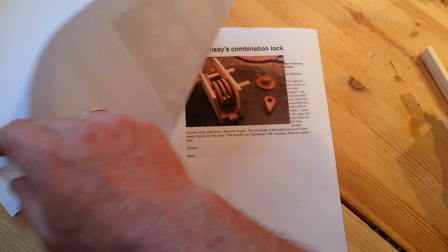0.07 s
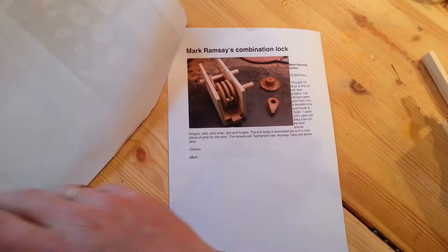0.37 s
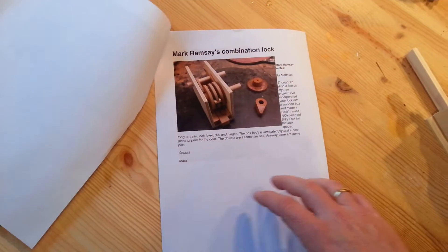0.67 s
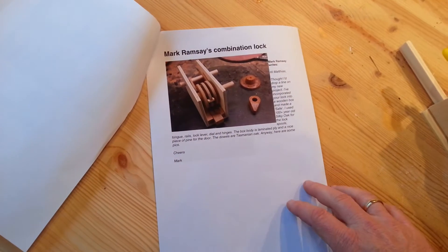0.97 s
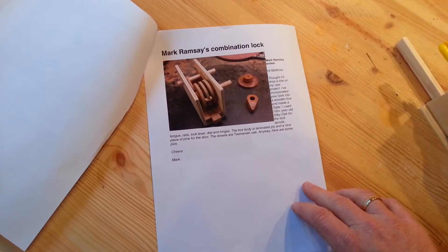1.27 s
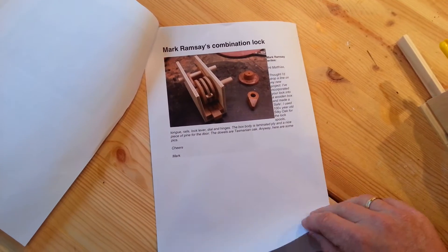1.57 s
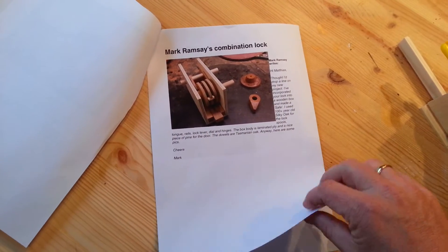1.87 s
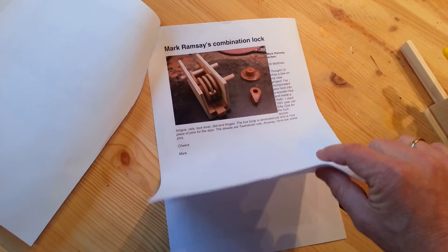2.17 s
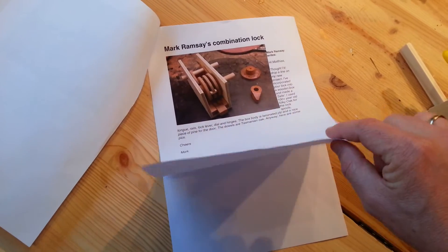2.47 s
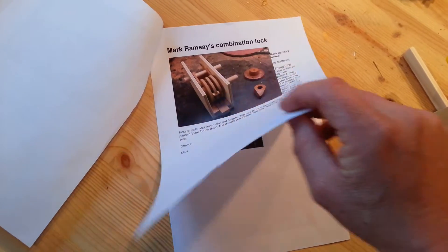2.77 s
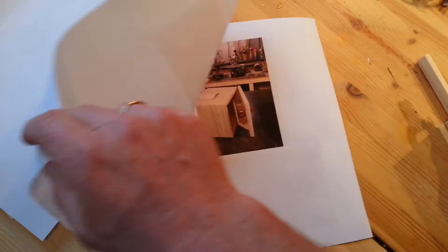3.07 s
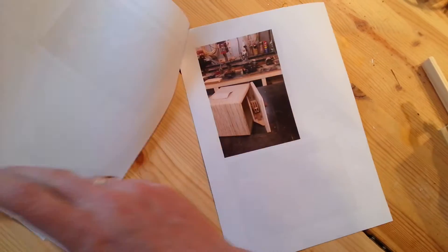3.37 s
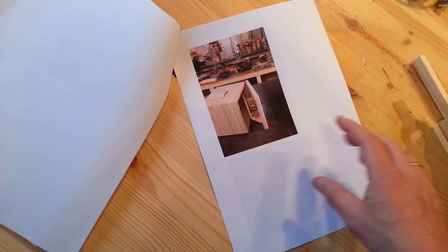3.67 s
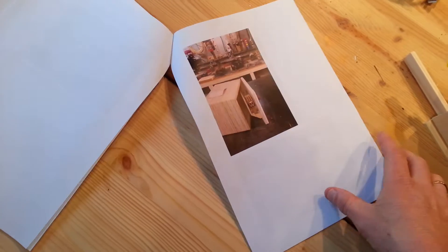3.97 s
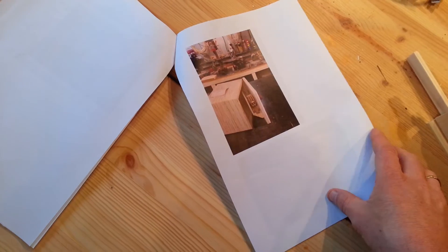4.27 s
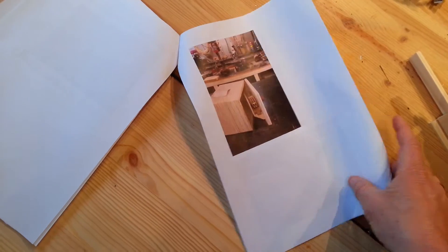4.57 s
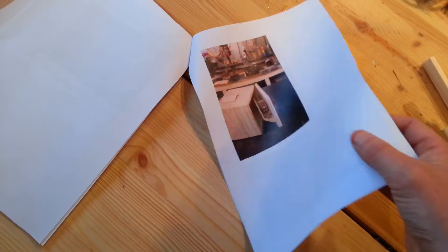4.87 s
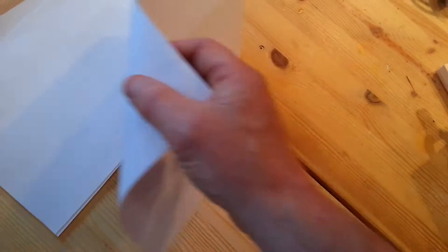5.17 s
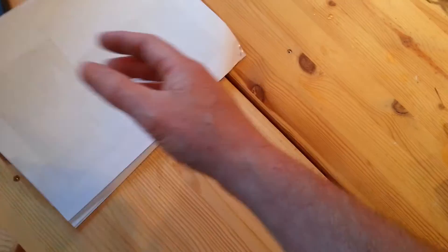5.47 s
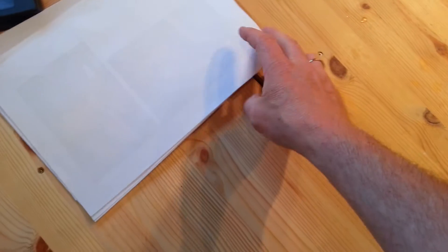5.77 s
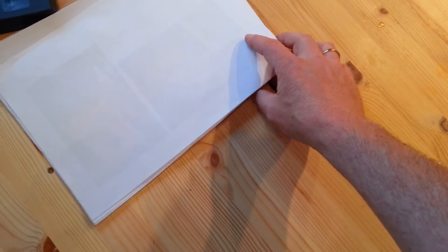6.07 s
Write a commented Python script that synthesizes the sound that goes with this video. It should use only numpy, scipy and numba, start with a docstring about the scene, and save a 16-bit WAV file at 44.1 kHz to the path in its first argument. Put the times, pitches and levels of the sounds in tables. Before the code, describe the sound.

A hand leafs through joined paper sheets on a wooden table. Fingers rub and slide over the paper in short, raspy swishes, and pages bend, crackle and flop over three times. About halfway, a falling page puffs air into the right side of the microphone with a brief thump. A few soft knocks on the wood come later. The sound is close and in stereo, in a small, quiet room.

```python
"""Leafing through paper

A hand leafs through joined sheets on a wooden table, close to a small stereo recorder in a room.
Fingers and sheets rub in countless tiny slips; each lifted page bends, snaps and flops over to the left.
One falling page pushes a puff of air into the right microphone's port (its opening)."""
import sys
import numpy as np
from scipy import signal
from scipy.fft import rfft, irfft
from scipy.io import wavfile
from scipy.ndimage import map_coordinates
from numba import njit

SR = 44100
rng = np.random.default_rng(int(sys.argv[2]) if len(sys.argv) > 2 else 0)


def waveform_to_disk(signal):
    """Save audio, clipped to [-1, 1], as 16-bit WAV at the path in sys.argv[1]."""
    frames = np.transpose(np.atleast_2d(signal))
    scaled = np.clip(frames, -1, 1) * 32767
    samples = np.round(scaled).astype(np.int16)
    wavfile.write(sys.argv[1], SR, samples)


N = 270333
TIME = np.arange(N) / SR


def from_db(db):
    """Turn decibels into a gain to multiply by."""
    return 10 ** (np.asarray(db) / 20)


def rms_one(x):
    """Scale a sound to an average (rms) level of 1."""
    return x / np.sqrt(np.mean(x ** 2) + 1e-20)


def in_time(rows):
    """Join a table's timed rows with straight lines: one curve for each column after the time."""
    times, *columns = np.transpose(rows)
    return [np.interp(TIME, times, column) for column in columns]


def colour(x, points, size=4096):
    """Shape the tone along (Hz, dB) points, with a filter that never rings ahead of the sound."""
    hz, db = np.transpose(points)
    log_hz = np.log(np.fft.rfftfreq(size, 1 / SR) + 1)
    cepstrum = irfft(np.log(from_db(np.interp(log_hz, np.log(hz), db))))
    cepstrum[1:size // 2] *= 2   # fold the early half onto the late half (minimum phase)
    cepstrum[size // 2 + 1:] = 0
    response = irfft(np.exp(rfft(cepstrum)))
    return signal.oaconvolve(np.atleast_2d(x), response[None], axes=1)[:, :N]


def drift(rate):
    """A smooth random wander of size about 1, with roughly `rate` turns a second."""
    pole = np.exp(-40 * np.pi * rate / SR)
    noise = rng.standard_normal(N // 20 + 2002)
    slow = signal.lfilter([1], [1, -2 * pole, pole * pole], noise)[2000:]
    return np.interp(np.arange(N) / 20, np.arange(len(slow)), rms_one(slow))


def delayed(x, ms):
    """Make a sound late by a delay that can keep changing."""
    return map_coordinates(x, [np.arange(N) - ms * SR / 1000], order=3)


def band_pass(x, hz, q):
    """Keep the sound near one pitch; a higher q keeps a narrower band."""
    return signal.lfilter(*signal.iirpeak(hz, q, fs=SR), x)


@njit
def swept_band(x, tangent, damping):
    """A band-pass (state-variable filter) whose pitch may move at every sample."""
    out = np.zeros_like(x)
    for side in range(len(x)):
        band_state, low_state = 0., 0.
        for i in range(x.shape[1]):
            g = tangent[i]
            band = (band_state + g * (x[side, i] - low_state)) / (1 + g * (g + damping))
            band_state = 2 * band - band_state
            low_state += 2 * g * band
            out[side, i] = damping * band
    return out


def resonate(x, hz, height_db, q):
    """Lift one moving pitch and lower the rest, so that loudness changes little."""
    height = from_db(height_db)
    band = swept_band(np.ascontiguousarray(x), np.tan(np.pi * hz / SR), 1 / q)
    return (x + (height - 1) * band) / np.sqrt(height)


def ringing(x, t60, size):
    """Ring very many pitches at once; t60 is the ring time, the seconds taken to fade by 60 dB."""
    tail = rng.standard_normal((2, size)) * np.exp(-np.log(1000) * TIME[:size] / t60)
    tail /= np.linalg.norm(tail, axis=1, keepdims=True)
    return signal.oaconvolve(x, tail, axes=1)[:, :N]


# tone of the background (frequency [Hz], relative level [dB])
HISS_TONE = [(20, 11), (160, 14), (350, 6), (800, -7.5), (2500, -6.5), (10000, -1), (15000, -2.5)]

def background_hiss(level_db=-75):
    """The still room and the recorder make a faint, steady noise."""
    return from_db(level_db) * rms_one(colour(rng.standard_normal((2, N)), HISS_TONE))


def room(x, t60=0.096, echo_db=-14):
    """A small furnished room adds a quick blur of echoes, different on each side."""
    return x + from_db(echo_db) * ringing(x, t60, size=16384)


# how the two microphone ports differ (frequency [Hz], left minus right [dB])
PORT_BALANCE = [(100, 0.5), (550, 2), (1140, -3), (1650, -6.5), (2400, -2.5), (3400, -3), (5000, 1),
                (6200, 2.5), (7200, -4.5), (8300, -12), (9700, -14), (15000, -15.5)]

def microphone_ports(x, left_hz=5770, right_hz=8920, ring_db=2.5):
    """Each port colours the sound, and its small cavity rings at a pitch of its own."""
    hz, tilt_db = np.transpose(PORT_BALANCE)
    right_db = 10 * np.log10(2 / (1 + from_db(tilt_db) ** 2))   # keeps the total power the same
    left = colour(x[0], np.c_[hz, right_db + tilt_db])[0]
    right = colour(x[1], np.c_[hz, right_db])[0]
    lift = from_db(ring_db) - 1
    return left + lift * band_pass(left, left_hz, q=7), right + lift * band_pass(right, right_hz, q=7)


def air_puff(port, start_s=3.23825, rise_s=.00006, hold_s=0.018, release_s=0.0053, ease_s=0.02):
    """Air pins the microphone's diaphragm, briefly deafening it; the bass cut makes that push a thump."""
    blocked_db, thump_db = -18, 2
    age = np.maximum(TIME - start_s, 0)
    freed = np.maximum(age - hold_s, 0)
    pinned = (age > 0) * np.exp(-(freed / release_s) ** 2)
    pressure = (1 - np.exp(-age / rise_s)) * np.exp(-(freed / ease_s) ** 2)
    bass_cut = signal.butter(1, 76, "high", fs=SR, output="sos")
    rumble_cut = signal.butter(2, 56, "high", fs=SR, output="sos")
    thump = signal.sosfilt(np.vstack([bass_cut, bass_cut, rumble_cut]), pressure)
    return port * from_db(blocked_db * pinned) + from_db(thump_db) * thump


# how hollow the rubbing sounds (time [s], delay of the copy [ms], strength [0-1])
HOLLOWNESS = [(.3, 0.69, 0.02), (.7, 0.71, 0.19), (1.75, 0.75, 0.2), (2.1, 0.87, 0.02), (3.3, 0.62, 0),
              (3.97, 0.63, 0.23), (4.6, 0.78, 0), (5.07, 0.53, 0.26), (5.4, 1, 0.07)]

def hollow_tone(x, dull_hz=3000, hollow_hz=760):
    """A dull, late copy and a dip near 760 Hz make some strokes sound hollow."""
    delay_ms, strength = in_time(HOLLOWNESS)
    dull = signal.sosfilt(signal.butter(1, dull_hz, fs=SR, output="sos"), x)
    late_copy = np.array([delayed(side, delay_ms) for side in dull])
    mixed = (x + strength * late_copy) / np.sqrt(1 + strength ** 2 / 2)
    return mixed - 1.5 * strength * band_pass(mixed, hollow_hz, q=1.1)


# the table top's own notes (pitch [Hz], relative level [dB], ring time [s])
WOOD_NOTES = [(112, -12, .09), (160, -7, .08), (243, -5, .07), (324, -1.5, .11), (465, -7.5, .02)]
# knocks on the table (time [s], strength [dB])
KNOCKS = [(1.308, -60), (1.396, -66.5), (1.524, -55), (2.682, -58), (4.592, -43.5), (4.734, -42.5),
          (5.428, -56), (5.866, -62)]

def table_knocks(soft_hz=900, spread_db=4.0):
    """Fingertips and the page's edge knock softly, each time ringing a new mix of the wood's notes."""
    out = np.zeros(N)
    times, knock_db = np.transpose(KNOCKS)
    at = np.round(times * SR).astype(int)
    for hz, note_db, t60 in WOOD_NOTES:
        clicks = np.full(N, 1e-18)
        clicks[at] = from_db(knock_db + note_db + rng.normal(0, spread_db, len(times)))
        fade, turn = np.exp(-np.log(1000) / (t60 * SR)), 2 * np.pi * hz / SR   # per sample
        out += signal.lfilter([.5, 0, -.5], [1, -2 * fade * np.cos(turn), fade * fade], clicks)
    return signal.sosfilt(signal.butter(2, soft_hz, fs=SR, output="sos"), out)


# the stiff corner's notes (pitch [Hz], relative level [dB])
CORNER_NOTES = [(3300, -13.5), (5850, -1.5), (7500, 0.5), (9150, -2)]

def corner_flick(start_s=1.5241, bounce_ms=0.538, gain_db=-10.3, t60=0.0036):
    """The page's corner slips off the finger, clicks down and bounces once, ringing very briefly."""
    out = np.zeros(N)
    for hit_s in (start_s, start_s + bounce_ms / 1000):
        age = np.clip(TIME - hit_s, 0, .1)
        notes = sum((-1) ** k * from_db(db) * np.sin(2 * np.pi * hz * age)
                    for k, (hz, db) in enumerate(CORNER_NOTES))
        out += notes * np.exp(-np.log(1000) * age / t60)
    return from_db(gain_db) * out


# the sheet snaps and buckles (time [s], level [dB], pitch [Hz], fade time [ms])
CREASES = [(.226, -41, 730, 61), (.25, -29.5, 1680, 16), (.285, -37, 1030, 22), (0.483, -66.5, 960, 39),
           (1.108, -34, 9370, 0.82), (1.117, -30, 9600, 0.31), (1.288, -60.5, 1290, 20),
           (1.289, -49.5, 8700, 19), (1.2996, -28, 9400, 0.27), (1.5242, -20, 5750, 4.5),
           (1.861, -43.5, 3598, 11), (1.983, -37, 1750, 6.4), (2.088, -44.5, 766, 54),
           (2.131, -31, 8350, 7), (2.212, -34.5, 1240, 4.7), (2.508, -24, 6440, 11),
           (2.508, -32.5, 1890, 21), (2.5164, -19.5, 7400, 3.6), (2.5212, -16.5, 8700, 2.4),
           (2.521, -36, 520, 13), (2.5303, -20, 1710, 2.1), (2.53, -27, 3180, 10),
           (2.584, -39.5, 2210, 9.8), (2.682, -55, 1290, 23), (2.8, -32, 2880, 2.2),
           (2.809, -36.5, 1480, 5.5), (3.254, -29, 9500, 20), (3.263, -40, 3380, 29), (3.272, -40, 677, 40),
           (4.207, -46, 4300, 26), (4.5872, -7.5, 7880, 0.87), (4.587, -25, 1710, 11.5),
           (4.5914, -23.5, 6000, 5.4), (4.722, -21, 7350, 1.6), (4.722, -34, 1090, 7.8),
           (4.731, -19, 6600, 0.97), (4.734, -23, 1640, 4.3), (5.218, -61.5, 1770, 12),
           (5.296, -54.5, 6630, 19), (5.376, -34, 6500, 11), (5.425, -37, 1120, 18),
           (5.561, -52, 2036, 13.5), (5.866, -25.5, 8200, 1.1), (5.866, -45.5, 1580, 3.2),
           (5.8717, -21.5, 8070, 0.82)]

def crease_snaps(shared=0.32, rise_cycles=0.46, crack=0.93, crackle_db=2.5, grain_ms=0.54, size=4096):
    """A crease runs through the sheet in a dying, uneven crackle: small patches tick, large ones pop."""
    out, age_ms = np.zeros((2, N)), 1000 * np.arange(size) / SR
    grain = (age_ms / grain_ms).astype(int)
    for start_s, db, hz, fade_ms in CREASES:
        noise = rng.standard_normal((3, size))   # left, right, and shared by both
        jumps = from_db(crackle_db * np.clip(rng.standard_normal(size), -2, 2))[grain]
        shape = np.exp(-age_ms / fade_ms) * (1 - np.exp(-TIME[:size] * hz / rise_cycles))
        burst = (np.sqrt(shared) * noise[2] + np.sqrt(1 - shared) * noise[:2]) * shape * jumps
        burst[:, 0] += crack / fade_ms ** 2   # the smallest patches flip in one go
        q = max(1, hz / 6500)
        burst = band_pass(band_pass(burst, hz, q), hz, q)
        burst *= np.linalg.norm(shape) / np.linalg.norm(burst, axis=1, keepdims=True)
        at = round(start_s * SR)
        out[:, at:at + size] += from_db(db) * burst[:, :N - at]
    return out


def slips(per_s, spread_db, bed):
    """Fibres catch and let go: uneven clicks over a bed of slips too fine to tell apart."""
    sizes = from_db(spread_db * np.minimum(rng.exponential(1, N), 4)) * rng.choice([-1, 1], N)
    clicks = rms_one(sizes * (rng.random(N) < per_s / SR))
    return rms_one(clicks + bed * rng.standard_normal(N))


# where the page rubs (time [s], left side's delay [ms], left minus right [dB])
PAGE_PLACE = [(0, 0.032, 0), (.6, 0.2, 4), (1.7, -0.0013, 1), (2.7, 0.048, 0.5), (3.45, -0.067, 1.5),
              (4.5, -.09, 1), (5.4, 0.12, 1)]

def paper(tone, per_s, spread_db, bed, patchy_db, shared, ring_db, t60):
    """Slips at the touching point reach both ports; the rest of the sheet sounds different in each."""
    lag_ms, _ = in_time(PAGE_PLACE)
    contact = slips(per_s, spread_db, bed)
    contact = np.array([delayed(contact, lag_ms), contact])
    sheet = np.array([slips(per_s, spread_db, bed) for side in range(2)])
    # the sheet's brief ring changes as it curls from one shape into another
    flat, curled = (ringing(sheet, t60, size=2048) for shape in range(2))
    curl = 2 * drift(0.99)
    sheet = rms_one(sheet + from_db(ring_db) * (np.cos(curl) * flat + np.sin(curl) * curled))
    both = np.sqrt(shared) * contact + np.sqrt(1 - shared) * sheet
    return rms_one(colour(both * from_db(patchy_db * drift(40)), tone))


def pan_with_page(x):
    """The left-right balance follows the place where the page rubs."""
    _, pan_db = in_time(PAGE_PLACE)
    return x * from_db(np.outer([1, -1], pan_db) / 2)


# a lifted sheet bends over or flops down
# (crest time [s], flutter level [dB], build-up time [s], rumble above flutter [dB], pitch [Hz])
PAGE_FLAPS = [(0.103, -45.5, 0.039, -6, 850), (0.237, -32, 0.011, -6.5, 996),
              (0.262, -30, 0.012, -15, 1468), (1.985, -54.5, 0.012, -2, 1500),
              (2.104, -44.5, 0.04, -4.5, 1345), (2.225, -47, 0.23, -9.5, 846),
              (2.302, -46.5, 0.013, -13.5, 1150), (2.535, -38.5, 0.024, -9.5, 1683),
              (2.818, -43, 0.023, -8, 1580), (2.901, -50.5, 0.0083, -19, 1600),
              (3.282, -38.5, 0.052, -7.5, 1130), (3.834, -47, 0.025, -7.5, 1450),
              (4.444, -54, 0.018, 3.5, 1500), (4.635, -43, 0.031, -3, 1695), (4.73, -33, 0.0043, -9, 950),
              (5.07, -56.5, 0.14, -25, 2300), (5.318, -43.5, 0.0082, -8, 1140),
              (5.434, -50, 0.048, 2, 1100)]

def flap_curves(rub_gain, settle_db_per_s=283.5, sag_octaves_per_s=14, sag_s=0.095):
    """Strokes shake the sheet a little; a flap builds, then fades and drops in pitch as it slackens."""
    shake_db, shake_hz = -16, 2500   # flutter of the taut sheet under a stroke
    drag_db, drag_follows = -54.5, 0.32   # rumble that follows a stroke only in part
    flutter_power = (from_db(shake_db) * rub_gain) ** 2
    rumble_power = (from_db(drag_db) * rub_gain ** drag_follows) ** 2
    weighted_hz = flutter_power * shake_hz   # the loudest movement has most say in the pitch
    for crest_s, db, build_s, rumble_db, hz in PAGE_FLAPS:
        age = np.clip(TIME - crest_s, -1, 1)
        gain = np.exp(np.minimum(age, 0) / build_s) * from_db(db - settle_db_per_s * np.maximum(age, 0))
        flutter_power += gain ** 2
        rumble_power += (gain * from_db(rumble_db)) ** 2
        weighted_hz += gain ** 2 * hz * 2 ** (-sag_octaves_per_s * np.clip(age, 0, sag_s))
    return np.sqrt(flutter_power), np.sqrt(rumble_power), weighted_hz / flutter_power


# tones of the small buckles and of the wobbling surface (frequency [Hz], relative level [dB])
FLUTTER_TONE = [(25, -55.5), (150, -31), (500, -14.5), (800, -9), (1150, -0.5), (1600, 0), (2100, -3),
                (3000, -5.5), (5000, -13.5), (12000, -37.5)]
RUMBLE_TONE = [(25, -38), (60, -16), (120, -4.5), (220, -1), (380, 1), (600, 0.5), (900, -1.5),
               (1500, -13.5), (4000, -43.5)]
# the whole sheet's notes (pitch [Hz], relative level [dB])
SHEET_NOTES = [(1034, 1.5), (1236, 4), (1367, 3), (1562, 4), (1928, 1)]

def bending(flutter_gain, rumble_gain, flutter_hz, note_width_hz=18, notes_db=4):
    """Small buckles patter while the surface wobbles; a hard flap leaves the whole sheet ringing."""
    flutter = paper(FLUTTER_TONE, per_s=1200, spread_db=3.5, bed=0.39,
                    patchy_db=3.0, shared=0.39, ring_db=0.5, t60=0.13)
    rumble = paper(RUMBLE_TONE, per_s=600, spread_db=4.0, bed=0.79,
                   patchy_db=0.5, shared=0.5, ring_db=-4.0, t60=0.091)
    flutter = flutter_gain * resonate(flutter, flutter_hz, height_db=3, q=1.8)
    hard_flaps = flutter * flutter_gain / flutter_gain.max()
    ring = sum(from_db(notes_db + db) * band_pass(hard_flaps, hz, hz / note_width_hz)
               for hz, db in SHEET_NOTES)
    return flutter + ring + rumble_gain * rumble


# gripped stretches of paper (start [s], end [s], pitch [Hz], lift above the rest [dB])
GRIPS = [(0, 0.496, 4960, 5.5), (.59, 0.882, 6130, 5), (1.5, 1.9, 5600, 6), (1.628, 1.864, 2640, 6),
         (1.903, 2.267, 6800, 4.5), (3.033, 3.3, 9700, 3.5), (3.31, 3.671, 5260, 6), (4.15, 4.37, 4270, 7),
         (4.15, 4.375, 2550, 5), (4.9, 5.2, 2940, 4)]

def zipping(x, wander_octaves=0.04):
    """Gripped paper rings around one wavering pitch, making the rubbing zip until the hand lets go."""
    wander = 2 ** (wander_octaves * drift(12))
    for start, end, hz, height_db in GRIPS:
        held = (TIME >= start) & (TIME < end)
        x = resonate(x, hz * wander, height_db * held, q=3.7)
    return x


# paper slides on paper and skin
# (start [s], length [s], rubbing level [dB], swell from start to end [dB], swish above rubbing [dB])
HAND_STROKES = [(0, 0.0087, -42.5, -10, 2.5), (0.063, 0.059, -49.5, -3.5, 2),
                (0.149, 0.015, -50.5, -3, 3.5), (0.179, 0.054, -45.5, 19.5, 1.5),
                (0.294, 0.11, -47, -2, 4.5), (0.521, 0.032, -65, 1, 5.5), (0.62, 0.14, -54, -2.5, 3.5),
                (1.081, 0.059, -61, 9, 6), (1.286, 0.0083, -54.5, -3, -5), (1.378, 0.13, -68.5, 17, 10.5),
                (1.518, 0.1, -42.5, -11, 5.5), (1.626, 0.068, -38, 5.5, 0.5),
                (1.714, 0.082, -39.5, 5.5, -2), (1.853, 0.029, -47, -21, -6),
                (1.898, 0.043, -57.5, 18.5, 0.5), (1.934, 0.15, -43, 7, -2), (2.067, 0.069, -34, 6.5, -0.5),
                (2.162, 0.062, -43.5, 7.5, 2), (2.277, 0.11, -43, 0, 0), (2.476, 0.044, -41, 24.5, -3),
                (2.666, 0.18, -56, 9, 0), (2.866, 0.091, -52, -0.5, 2.5), (2.974, 0.17, -56, 18, -0.5),
                (3.055, 0.2, -50, 12.5, 11), (3.315, 0.14, -50, 4.5, 7), (3.48, 0.28, -67, -26.5, 7.5),
                (3.772, 0.084, -46.5, 5, -1.5), (3.867, 0.14, -52.5, 8, 9), (4.199, 0.086, -43, 12, 2),
                (4.385, 0.082, -46.5, 4, -2.5), (4.481, 0.096, -44.5, 0.5, 4),
                (4.579, 0.058, -35.5, -1, 4.5), (4.695, 0.04, -42.5, 8, 1.5), (4.79, 0.053, -50.5, 2, -2.5),
                (4.908, 0.063, -57.5, -7, 6.5), (4.944, 0.13, -44.5, 7, -1), (5.294, 0.092, -43, 3.5, 2),
                (5.538, 0.053, -57, 5, -3), (5.854, 0.18, -63, -18.5, 2), (6.058, 0.079, -55, 11, 5.5)]

def stroke_gains(grip_s=0.0076, coast_db_per_s=311):
    """Each stroke grips quickly, swells or eases as the hand moves, then coasts to rest."""
    rub_power, swish_power = np.full((2, N), 1e-14)
    for start, length, db, swell_db, swish_db in HAND_STROKES:
        age = TIME - start
        grip = .5 + .5 * np.tanh(age / grip_s - 1)
        push_db = swell_db * (np.clip(age / length, 0, 1) - .5)
        gain = grip * from_db(db + push_db - coast_db_per_s * np.clip(age - length, 0, 1))
        rub_power += gain ** 2
        swish_power += (gain * from_db(swish_db)) ** 2
    return np.sqrt(rub_power), np.sqrt(swish_power)


# tones of flat rubbing and of the page's edge (frequency [Hz], relative level [dB])
RUB_TONE = [(300, -27.5), (900, -34.5), (1700, -6), (2600, -6.5), (3400, -4.5), (4400, -1), (5700, -3),
            (7200, -7), (9500, -8.5), (15000, -25)]
SWISH_TONE = [(3000, -31), (6000, -8), (8000, -6), (9700, -3), (11000, -7.5), (12500, -8.5), (14800, -14)]

def sliding(rub_gain, swish_gain, ticks_db=-14.5):
    """Flat rubbing rasps; the page's edge adds a bright swish and lone ticks where a fibre catches."""
    rub = paper(RUB_TONE, per_s=4000, spread_db=3.5, bed=0.68,
                patchy_db=1.8, shared=0.2, ring_db=-2.0, t60=0.038)
    swish = paper(SWISH_TONE, per_s=3300, spread_db=4.5, bed=0.96,
                  patchy_db=2.08, shared=0.13, ring_db=-4.5, t60=0.022)
    ticks = rms_one(colour(slips(per_s=310, spread_db=3.5, bed=0), SWISH_TONE))
    return zipping(rub_gain * rub + swish_gain * (swish + from_db(ticks_db) * ticks))


def scene():
    """Paper and table sound in the room and reach the two microphones over a faint hiss."""
    rub_gain, swish_gain = stroke_gains()
    pages = sliding(rub_gain, swish_gain) + bending(*flap_curves(rub_gain))
    pages = pan_with_page(hollow_tone(pages) + crease_snaps() + corner_flick())
    left, right = microphone_ports(room(pages + table_knocks()))
    return np.array([left, air_puff(right)]) + background_hiss()


def record(dry, limit=.9, cutoff_hz=14650):
    """The recorder flattens any peak past its limit and cuts the highest treble."""
    treble_cut = signal.ellip(14, .1, 120, cutoff_hz, fs=SR, output="sos")
    return signal.sosfilt(treble_cut, np.clip(dry, -limit, limit))


dry = scene()
out = record(dry)
waveform_to_disk(out)
```